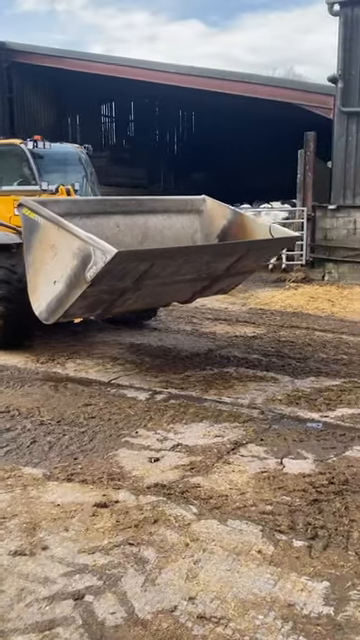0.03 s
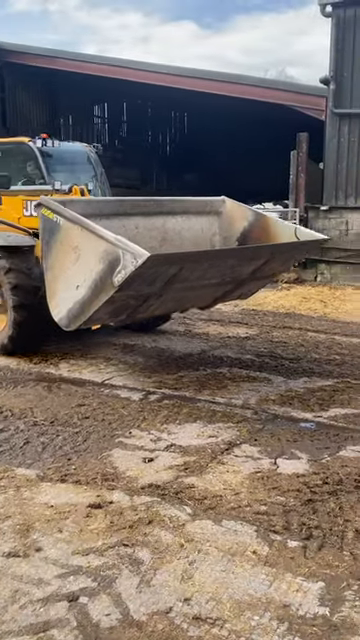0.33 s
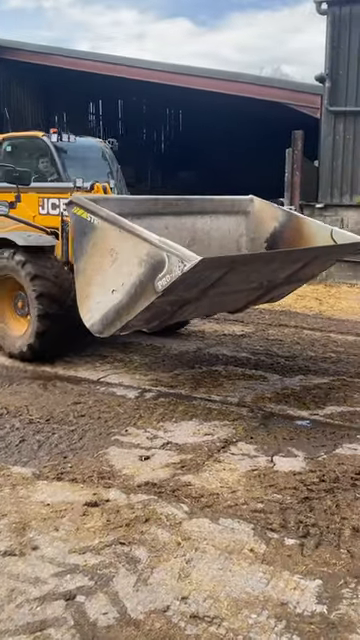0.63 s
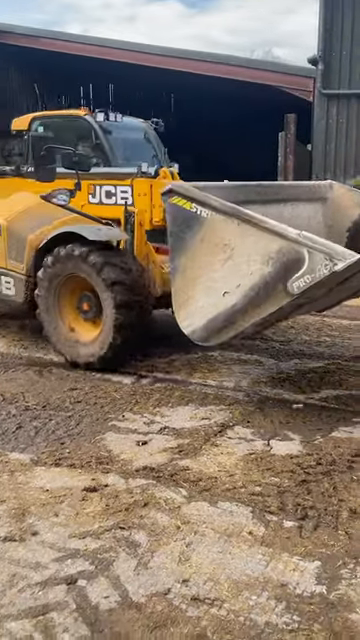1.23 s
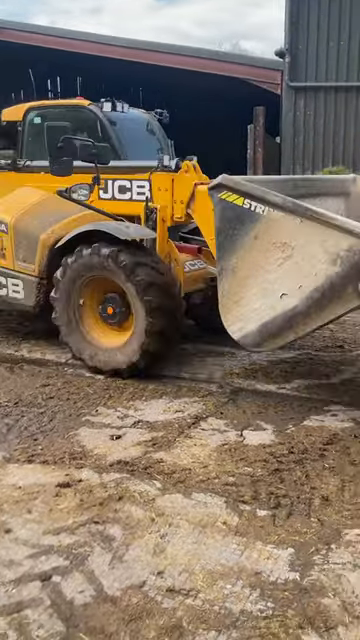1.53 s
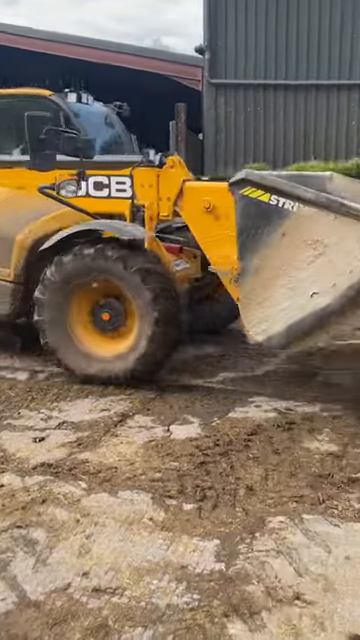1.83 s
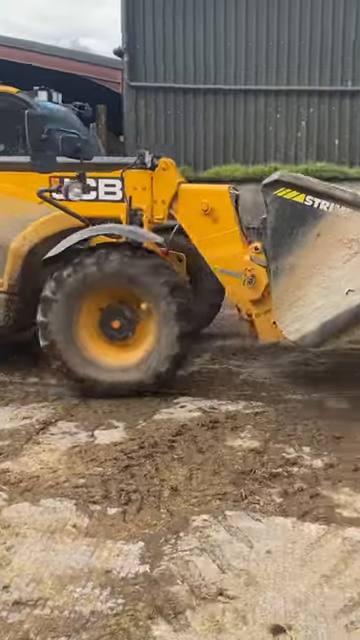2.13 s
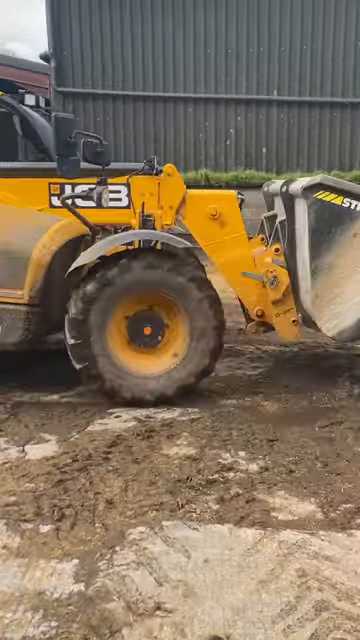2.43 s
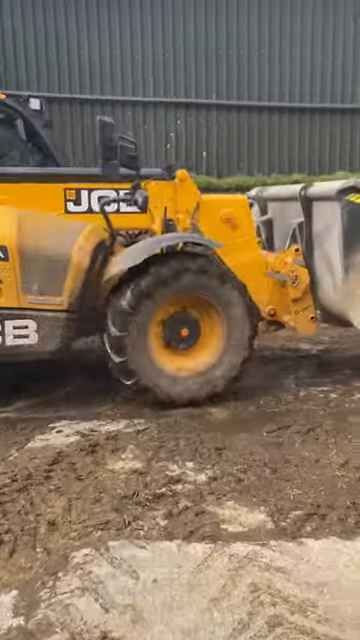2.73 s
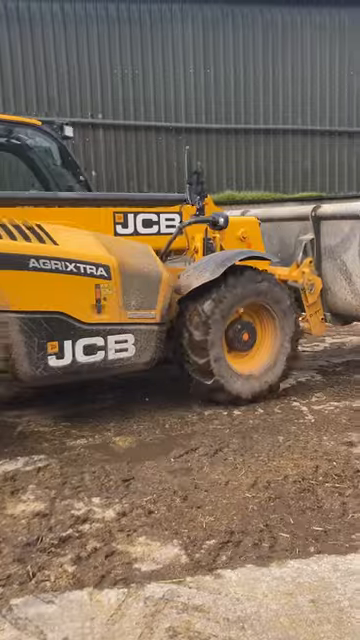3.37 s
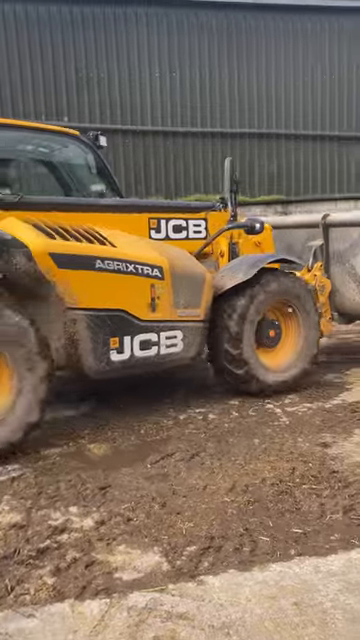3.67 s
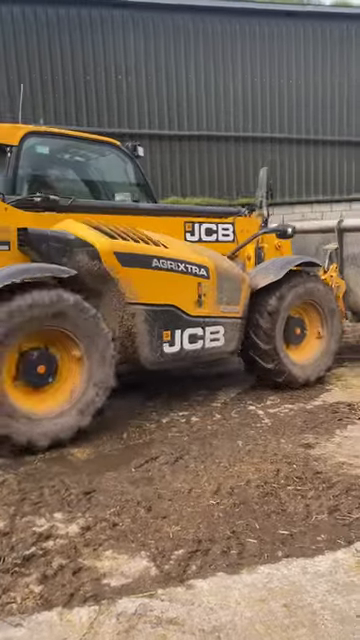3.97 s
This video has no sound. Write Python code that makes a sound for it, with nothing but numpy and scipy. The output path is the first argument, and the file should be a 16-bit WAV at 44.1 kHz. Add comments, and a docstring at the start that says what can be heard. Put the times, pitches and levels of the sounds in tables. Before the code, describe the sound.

Diesel loader engine rumbling by at walking pace, then easing off, tyres fizzing through muck.

```python
"""On a wet, muddy concrete yard, a diesel loader rolls past at walking pace and eases off the throttle.
Its four cylinders fire in turn: each firing puffs from the exhaust and makes the engine block clatter.
The cooling fan hums and roars, gears whine, thin panels ring, and the engine bay booms near the end.
The tyres press through wet muck that fizzes and spits, and crack bits of grit. It is heard from one side."""
import sys
import numpy as np
from scipy import signal
from scipy.fft import rfft, irfft
from scipy.io import wavfile

SR = 44100
rng = np.random.default_rng(int(sys.argv[2]) if len(sys.argv) > 2 else 0)


def inscribe(sig):
    """Save sig as 16-bit PCM at rate SR to the path in sys.argv[1].

    A 1-D sig is mono; a 2-D sig holds one channel per row.
    Samples are clipped to [-1, 1] before scaling.
    """
    pcm = np.round(np.clip(np.atleast_2d(sig).T, -1, 1) * 32767)
    wavfile.write(sys.argv[1], SR, pcm.astype(np.int16))


N = 4 * SR
T = np.arange(N) / SR
HZ = np.maximum(np.arange(N // 2 + 1) * SR / N, 1)
SIDES = np.array([[1], [-1]]) / 2   # half up on the left, half down on the right


def from_db(db):
    """Turn decibels into a number to multiply by."""
    return 10 ** (np.asarray(db) / 20)


def rms_one(x):
    """Scale a signal to an average power of 1."""
    return x / np.sqrt(np.mean(x ** 2) + 1e-20)


def in_time(rows):
    """Join a table's rows with straight lines: one curve for each column after the time."""
    times, *columns = np.transpose(rows)
    return [np.interp(T, times, column) for column in columns]


def swell(rows):
    """A volume curve that rises and falls around the table's average level."""
    db = in_time(rows)[0]
    return from_db(db - db.mean())


def at_hz(points):
    """Read a table at every frequency."""
    hz, value = np.transpose(points)
    return np.interp(np.log(HZ), np.log(hz), value)


def drift(rate_hz):
    """A smooth random wobble of typical size 1, mostly slower than rate_hz."""
    return rms_one(irfft(rfft(rng.standard_normal(N)) / (1 + (HZ / rate_hz) ** 2), N))


def noise():
    """Two unrelated white noises."""
    return rng.standard_normal((2, N))


def coloured(x, spectrum):
    """Shape a signal by a table of levels per hertz, fading 30 dB an octave above the last row."""
    db = at_hz(spectrum) - 30 * np.maximum(np.log2(HZ / spectrum[-1][0]), 0)
    return irfft(rfft(x) * from_db(db) * np.sqrt(SR / 2), N)


def ring(x, hz, width_hz):
    """Make a signal ring at one pitch by passing it twice through a resonance."""
    r = np.exp(-np.pi * width_hz / SR)
    feed = np.array([1, 0, -1]) * (1 - r * r) / 2
    feedback = [1, -2 * r * np.cos(2 * np.pi * hz / SR), r * r]
    for _ in range(2):
        x = signal.lfilter(feed, feedback, x + 1e-18)
    return x


def tone(cycles):
    """A pure tone that follows a running count of cycles."""
    return np.sqrt(2) * np.sin(2 * np.pi * (cycles + rng.random()))


def whine(cycles, flutter_db=3.2, waver_hz=7):
    """A thin tone that flutters in loudness and pitch."""
    return from_db(flutter_db * drift(15)) * tone(cycles + np.cumsum(waver_hz * drift(24.2)) / SR)


def engine_tones(fired, table, swing_db=2.5):
    """Tones tied to the count of firings so far, each slowly swelling and fading."""
    return sum(from_db(db + swing_db * drift(3)) * tone(multiple * fired) for multiple, db in table)


def engine_noise(fired, repeat_share=0.49, size=4096):
    """Two noises that partly repeat every four firings, so they slide in pitch with the engine."""
    place = (fired / 4 % 1 * size).astype(int)
    pattern = rng.standard_normal((2, size))[:, place]
    return np.sqrt(repeat_share) * pattern + np.sqrt(1 - repeat_share) * noise()


def screening(x, swing_db=2.5):
    """Panels and wheels get in the way: twelve bands, a third of an octave apart, swell and fade."""
    place = np.clip(3 * np.log2(HZ / 350), 0, 11)
    spectrum = rfft(x)
    bands = (irfft(spectrum * np.maximum(1 - np.abs(place - k), 0), N) for k in range(12))
    return sum(band * from_db(swing_db * (drift(15.4) - 0.67)) for band in bands)


# How alike left and right sound: f/Hz, likeness from 0 to 1
EAR_LIKENESS = [(170, 1), (270, 0.99), (350, 0.76), (620, 0.71), (870, 0.083), (1170, 0.79), (1650, 0.78),
                (1900, 0.31), (2600, 0.39), (3200, 0.88), (3900, 0.22), (5300, 1), (6500, 0.73), (8300, 1),
                (10300, 0.65), (15000, 0.96)]
def spread(pair):
    """Make left and right: both share the first signal and take the second with opposite signs."""
    alike = at_hz(EAR_LIKENESS)
    shared, opposed = rfft(pair)
    return irfft(np.sqrt((1 + alike) / 2) * shared + np.sqrt((1 - alike) / 2) * opposed * [[1], [-1]], N)


# How far the left wave runs ahead of the right: f/Hz, phase/rad
LEFT_LEAD = [(20, .3), (42, .35), (86, -.65), (170, -1.8), (240, -2.9), (310, -4.4), (400, -5.8),
             (520, -5.6), (740, -5.1), (1000, -2.4), (1250, -2.4), (1420, -1.3), (1700, -2.6), (2300, -3.6),
             (2700, -2.8), (3600, -3), (4200, -4), (5200, -3.2), (5800, -3.1), (6200, -2.6), (7700, -.3),
             (9300, .3), (11300, 3.1), (12800, 3.2), (14000, 6.28)]
# How much louder the left is than the right: f/Hz, level/dB
LEFT_LOUDER = [(60, -1), (160, -0.5), (300, -2), (430, -3), (560, -1), (800, 8), (1000, 2), (1300, 0),
               (1800, -1), (2500, -0.5)]
def from_one_side(x):
    """Sound from the side reaches left and right at unequal times and strengths."""
    balance = from_db(SIDES * at_hz(LEFT_LOUDER))
    shift = np.exp(1j * SIDES * at_hz(LEFT_LEAD))
    return irfft(rfft(x) * balance * shift, N)


# Loudness of the whistle: t/s, level/dB
WHISTLE_LOUDNESS = [(0, -78), (1.3, -76), (1.55, -65), (1.8, -70), (2.1, -62), (2.4, -68), (2.6, -60),
                    (2.85, -72), (3.1, -65), (3.35, -60), (3.6, -70), (4, -68)]
def whistle(blade_hz, multiple=20.4):
    """A faint, high whistle that sinks as the fan slows."""
    return from_db(in_time(WHISTLE_LOUDNESS)[0]) * whine(multiple * np.cumsum(blade_hz) / SR)


# Notes of the gears: multiple of the firing rate, level/dB
GEAR_NOTES = [(28, -60), (33, -58), (42, -56), (46, -61), (70, -64)]
# Boost added to all those notes: t/s, level/dB
GEAR_BOOST = [(0, -4), (.4, -0.5), (1, -2), (1.3, 0.5), (1.7, 1.5), (2.07, 7.5), (2.3, 2.5), (2.55, 7),
              (2.85, -10), (4, -2)]
def gears(fired):
    """Meshing teeth whine, rising and falling with the engine's speed."""
    notes = sum(from_db(db) * whine(multiple * fired) for multiple, db in GEAR_NOTES)
    return notes * from_db(in_time(GEAR_BOOST)[0])


# Notes of the panels: f/Hz, width/Hz, level/dB
PANEL_NOTES = [(1300, 160, -51.5), (1807, 105, -47.5), (1942, 73, -54), (2413, 59, -54.5),
               (3184, 25, -56.5)]
# Boost added to all those notes: t/s, level/dB
PANEL_BOOST = [(0, -20), (.7, -6.5), (1.2, 1.5), (1.85, 5), (1.98, 2), (2.07, 13), (2.2, 1.5), (2.6, 3.5),
               (3.05, 6), (3.5, 2), (4, -20)]
def panels(fired):
    """The engine's shaking keeps thin panels ringing."""
    shake = engine_noise(fired)
    notes = sum(from_db(db) * rms_one(ring(shake, hz, 2 * width)) for hz, width, db in PANEL_NOTES)
    return notes * from_db(in_time(PANEL_BOOST)[0])


# Tone colour of the boom: f/Hz, level/dB
BOOM_COLOUR = [(120, -75), (195, -67), (280, -66.5), (350, -81.5), (500, -92.5)]
# How the boom swells: t/s, level/dB
BOOM_SWELL = [(0, -10.5), (2.6, -15), (3.2, -10), (3.5, -6.5), (3.75, 3), (4, 0.5)]
def bay_boom(fired, pan_db=-0.5):
    """The engine bay booms straight at the listener as its side draws level."""
    boom = spread(coloured(engine_noise(fired), BOOM_COLOUR))
    return boom * swell(BOOM_SWELL) * from_db(pan_db * SIDES)


# Tone colour of the wet muck: f/Hz, level/dB
MUCK_COLOUR = [(2500, -100), (4200, -97), (5500, -84), (6700, -79.5), (8800, -78.5), (10300, -81),
               (11500, -108.5), (13000, -105), (15000, -98.5), (16000, -98)]
# How its sound swells: t/s, level/dB
MUCK_SWELL = [(0, -5.5), (.6, -3), (1.2, -0.5), (1.8, 2), (2.3, 4.5), (2.6, 4), (3, 6), (3.5, 5), (4, 3)]
def muck(pops_per_s=1100, size_spread_db=3, clump_db=1.8):
    """Tyres press wet muck: clumps of tiny pops over a fine fizz."""
    popping = rng.random((2, N)) < pops_per_s / SR
    sizes = from_db(size_spread_db * np.minimum(rng.exponential(1, (2, N)), 5))
    signs = rng.choice([-1, 1], (2, N))
    pops = from_db(-3.5) * rms_one(popping * sizes * signs * from_db(clump_db * drift(25)))
    fizz = from_db(-5.5) * noise()
    return coloured(pops + fizz, MUCK_COLOUR) * swell(MUCK_SWELL)


# Single spits of mud: t/s, relative level/dB, f/Hz, fade time/s
MUD_SPITS = [(0.774, -21.5, 8800, .003), (1.0282, -22, 8700, .002), (1.615, -28, 8850, 0.0025),
             (1.896, -22, 8108, 0.0023), (2.014, -23, 7940, 0.0016), (2.029, -17.5, 8173, 0.0018),
             (2.1139, -7, 7200, 0.004), (2.178, -20, 7500, .002), (2.261, -17.5, 8560, 0.0035),
             (2.327, -15, 7990, .002), (2.514, -16, 8500, 0.0032), (2.738, -20, 7998, 0.004),
             (2.771, -19, 8465, 0.003), (2.786, -20, 9100, .002), (2.807, -18, 8340, 0.0019),
             (2.878, -21, 6900, 0.0049), (3.030, -18, 8590, 0.0039), (3.053, -17.5, 8620, 0.0038),
             (3.374, -22, 7600, 0.0035), (3.414, -13, 3896, 0.0036), (3.492, -17, 4100, .003)]
def spits(rise_share=0.4, sharpness=1.7, trim_db=-3.5):
    """The tread squeezes out pockets of water and grit, each a short, bright crackle."""
    t = np.arange(-SR // 100, SR // 25) / SR
    out = np.zeros(N)
    for when, db, hz, fade_s in MUD_SPITS:
        shape = np.exp(-np.abs(t) / fade_s / np.where(t < 0, rise_share, 1))
        burst = ring(rng.standard_normal(len(t)) * shape, hz, hz / sharpness)
        burst = rms_one(burst) * np.sqrt(np.mean(shape ** 2)) / 2
        out += from_db(db + trim_db) * np.interp(T - when, t, burst, 0, 0)
    return out


# Single cracks of grit: t/s, peak level/dB, f/Hz, width/Hz
GRIT_SNAPS = [(1.0572, -14, 7300, 7000), (2.1110, -17, 7200, 2200), (2.1123, -11, 7200, 2600),
              (2.1132, -6.5, 7200, 3400), (2.1153, -14, 7000, 1500), (3.2395, -8.5, 6000, 4600)]
def snaps():
    """Grit cracks under the tyres, each time with one sharp click that barely rings."""
    out = np.zeros(N)
    for when, db, hz, width_hz in GRIT_SNAPS:
        crack = ring(signal.unit_impulse(N, int(when * SR)), hz, width_hz)
        out += from_db(db) * crack / np.abs(crack).max()
    return out


# Tone colour of the rumble: f/Hz, level/dB
RUMBLE_COLOUR = [(20, -82), (40, -78), (60, -64), (100, -53.5), (150, -59), (200, -56.5), (400, -109)]
# How the rumble swells, along with the exhaust's puffs and weak tones: t/s, level/dB
LOW_SWELL = [(0, -0.5), (1.2, -0.5), (2.2, 2.5), (2.6, 2), (3.2, 0.5), (3.6, -2.5), (4, -5.5)]
def rumble():
    """The frame and the rolling tyres make a low rumble."""
    return coloured(noise(), RUMBLE_COLOUR) * swell(LOW_SWELL)


# Tone colour of the rushing air: f/Hz, level/dB
AIR_COLOUR = [(180, -62.5), (330, -60.5), (420, -61), (540, -57), (640, -62.5), (740, -68.5), (1000, -73.5),
              (2000, -83)]
# Engine tones that stand out of the rush: multiple of the firing rate, level/dB
AIR_TONES = [(9, -48), (9.5, -53.5), (10.5, -54.5), (12, -50), (12.5, -45.5), (14, -54.5), (14.5, -53.5),
             (16.5, -58.5)]
# How both swell: t/s, level/dB
AIR_SWELL = [(0, -3.5), (.6, -4), (1.2, -1), (1.8, 1.5), (2.35, 2.5), (3, 2), (3.5, 1), (4, -2)]
def cooling_air(fired):
    """The fan drives a roar of air with the engine's higher tones in it."""
    rush = coloured(engine_noise(fired), AIR_COLOUR)
    tones = engine_tones(fired, AIR_TONES) * [[1], [0]]   # only in the signal both ears share
    return (rush + tones) * swell(AIR_SWELL)


# How often a fan blade passes: t/s, f/Hz
BLADE_RATE = [(0.0, 163.6), (0.3, 159.8), (0.55, 155.7), (0.75, 154.8), (1.0, 155.7), (1.3, 158.6),
              (1.55, 159.9), (1.8, 160.3), (2.05, 158.5), (2.3, 157), (2.5, 158.2), (2.75, 153.7),
              (3.0, 150.9), (3.25, 145.1), (3.5, 140.7), (3.75, 135.2), (4.0, 130.0)]
# Tones at 1, 2 and 4 times that rate: t/s, then level/dB for each
FAN_TONES = [(0, -28, -41, -51), (.4, -33, -37.5, -48.5), (.85, -33.5, -41, -45), (1.2, -32, -33, -44),
             (1.38, -32.5, -46, -46.5), (1.68, -30.5, -28, -53), (1.92, -29.5, -46, -45.5),
             (2.1, -32, -31, -46), (2.35, -29.5, -32, -46), (2.55, -31, -36, -37.5), (2.72, -28, -43, -38),
             (2.9, -31, -37.5, -45.5), (3.2, -40.5, -30.5, -45), (3.55, -29.5, -28, -52),
             (4, -33.5, -95, -46)]
# Boost added to each of the three: level/dB
FAN_BOOST = [0.7, 1, 0]
def fan_hum(blade_hz, pitch_waver=0.002, waver_db=0.92):
    """Passing blades hum one wavering note and the two octaves above it."""
    passes = np.cumsum(blade_hz * (1 + pitch_waver * drift(7.1))) / SR
    return sum(from_db(db + FAN_BOOST[k] + waver_db * drift(10)) * tone(2 ** k * passes)
               for k, db in enumerate(in_time(FAN_TONES)))


# Tone colour of the clatter: f/Hz, level/dB
CLATTER_COLOUR = [(400, -103), (750, -73), (1000, -71), (1350, -68), (1560, -69), (1830, -70),
                  (2250, -76.5), (3000, -75), (3700, -78.5), (4500, -76), (5500, -84.5), (8000, -84),
                  (11000, -100)]
# How the clatter swells: t/s, level/dB
CLATTER_SWELL = [(0, -1.5), (.6, -1), (1.3, 0), (1.95, 2.5), (2.07, 4.5), (2.2, 4.5), (2.65, 4), (2.95, 5),
                 (3.4, 2.5), (4, 0.5)]
def block_clatter(fired, clicks, fade_s=0.0059, depth=0.33):
    """Every firing shakes a burst of clatter from the engine block."""
    knocks = signal.lfilter([1], [1, -np.exp(-1 / (fade_s * SR))], clicks)
    rattle = rms_one(engine_noise(fired) * (1 + depth * knocks))
    return coloured(rattle, CLATTER_COLOUR) * swell(CLATTER_SWELL)


# Strength of each of the four cylinders: level/dB
CYLINDER_STRENGTH = [-0.5, 4, -1, -6.5]
def firings(fired, jitter_s=0.00026, scatter_db=2.1):
    """The cylinders fire in turn: one click each, a little uneven in time and strength."""
    due = np.flatnonzero(np.diff(np.floor(fired)) > 0)
    late, strong = rng.standard_normal((256, 2))[:len(due)].T
    at = np.clip(due + (late * jitter_s * SR).astype(int), 0, N - 1)
    clicks = np.zeros(N)
    clicks[at] = from_db(np.resize(CYLINDER_STRENGTH, len(due)) + scatter_db * strong)
    return clicks


# The engine's throb: t/s, firing rate f/Hz, then level/dB (before boost) at 1, 2 and 3 times that rate
THROB = [(0.0, 41.48, -32, -37, -46), (0.12, 40.95, -43, -26.5, -34), (0.3, 39.72, -44, -27, -43),
         (0.5, 40.78, -42, -27, -43), (0.65, 41.53, -41, -30.5, -34.5), (0.8, 42.53, -36.0, -34, -46),
         (1.05, 42.91, -33, -31.5, -36.5), (1.3, 43.56, -35.5, -32, -34.5), (1.55, 43.08, -31, -27, -29.5),
         (1.8, 41.65, -37, -27, -33.0), (2.05, 41.95, -36, -23, -32), (2.3, 43.17, -33.0, -32.5, -29),
         (2.55, 40.95, -37, -25.5, -33), (2.7, 39.51, -45, -29, -28), (2.85, 38.19, -47, -26, -29.5),
         (3.0, 38.1, -45.0, -36, -32.5), (3.12, 36.01, -44.0, -29.0, -22.5), (3.3, 35.0, -51, -27.5, -30),
         (3.5, 33.31, -49, -32, -37.0), (3.7, 32.85, -53, -37.5, -41), (3.85, 31.83, -53, -30, -35),
         (4.0, 31.1, -50.5, -31, -26)]
# Weaker tones from the unequal cylinders: multiple of the firing rate, level/dB
UNEVEN_TONES = [(1.5, -46.5), (1.75, -39.5), (2.25, -50.5), (2.5, -49), (2.75, -37), (3.25, -40.5),
                (4, -43), (4.25, -47)]
# Tone colour of the puffs: f/Hz, level/dB
PUFF_COLOUR = [(25, -94), (50, -74), (70, -58.5), (110, -63), (145, -55), (190, -56.5), (260, -61.5),
               (400, -67.5), (600, -69.5), (900, -97)]
def exhaust(fired, clicks, boosts_db=(0, 1, 1.2), swing_db=0.9):
    """The exhaust puffs at each firing and throbs with three deep tones; weaker ones beat against them."""
    throb = sum(from_db(db + boosts_db[k] + swing_db * drift(5.8)) * tone((k + 1) * fired)
                for k, db in enumerate(in_time(THROB)[1:]))
    puffs = coloured(rms_one(clicks), PUFF_COLOUR)
    return throb + (engine_tones(fired, UNEVEN_TONES) + puffs) * swell(LOW_SWELL)


def scene():
    """Add up the loader's sounds, most of them arriving from one side."""
    fired = np.cumsum(in_time(THROB)[0]) / SR   # running count of firings
    blade_hz = in_time(BLADE_RATE)[0]
    clicks = firings(fired)
    machine = screening(block_clatter(fired, clicks) + rumble() + cooling_air(fired))
    wide = spread(machine + panels(fired) + muck())
    narrow = exhaust(fired, clicks) + fan_hum(blade_hz) + spits() + snaps()
    return from_one_side(wide + narrow) + bay_boom(fired) + gears(fired) + whistle(blade_hz)


def record(dry, cutoff_hz=15900):
    """Cut away the very highest treble."""
    return signal.sosfilt(signal.ellip(10, .1, 80, cutoff_hz, fs=SR, output="sos"), dry)


dry = scene()
out = record(dry)
inscribe(out)
```